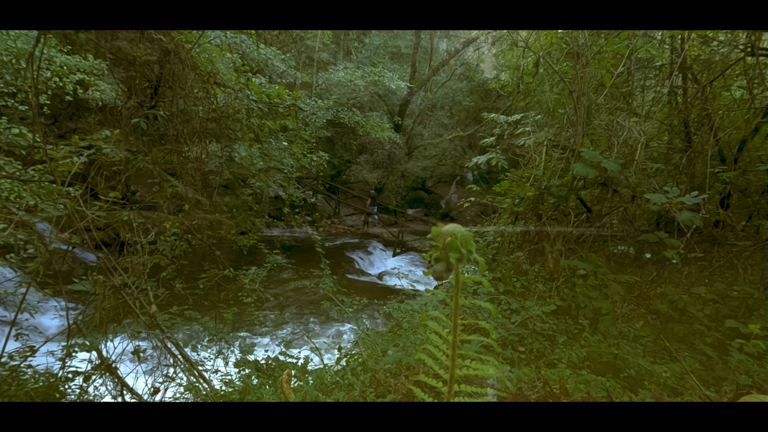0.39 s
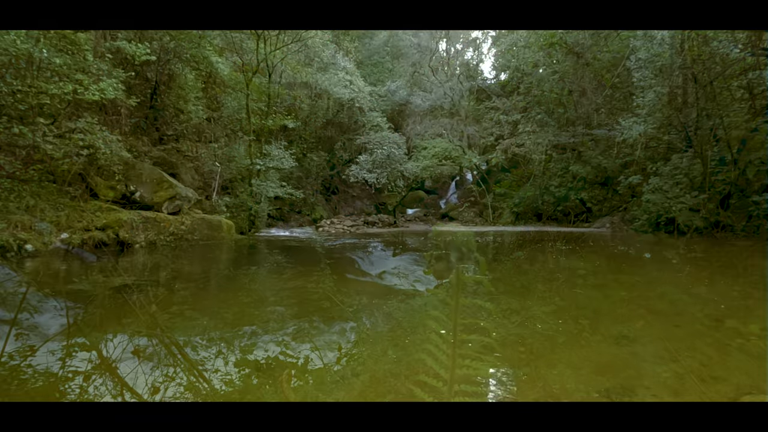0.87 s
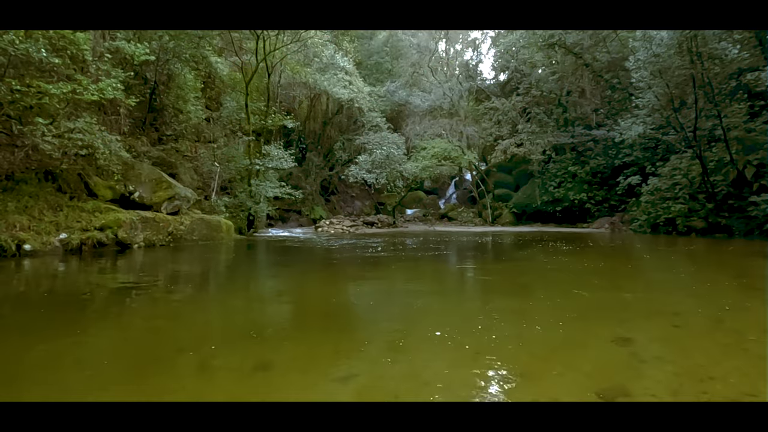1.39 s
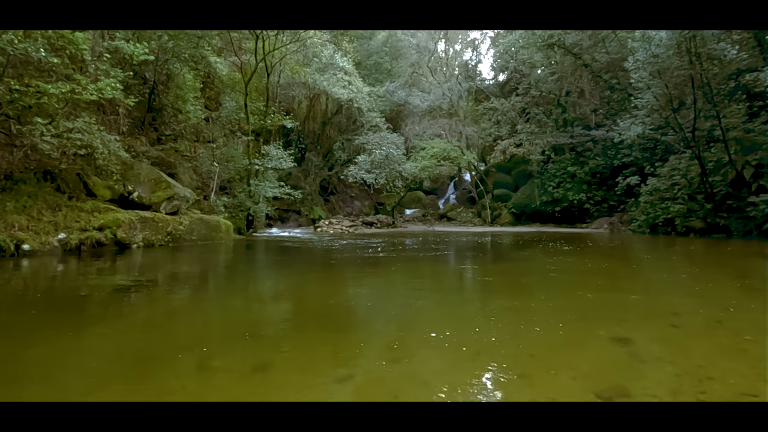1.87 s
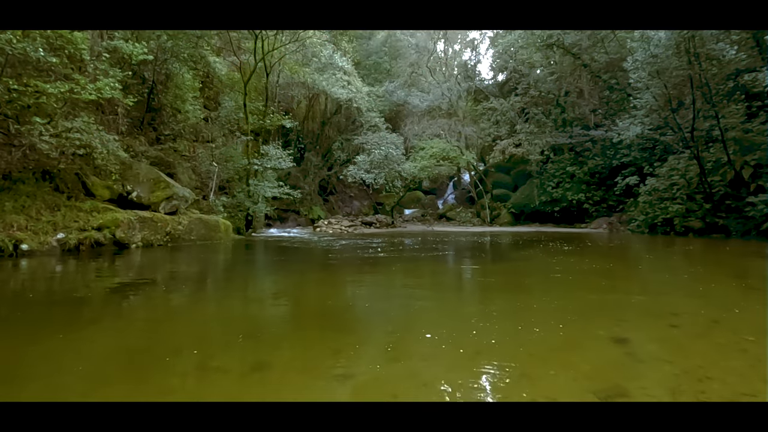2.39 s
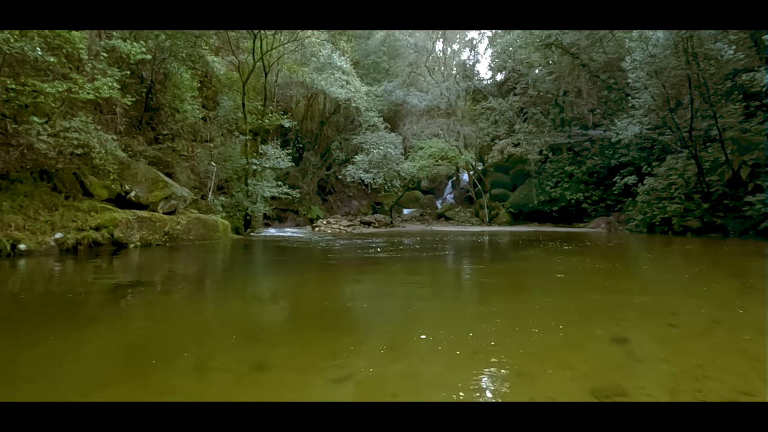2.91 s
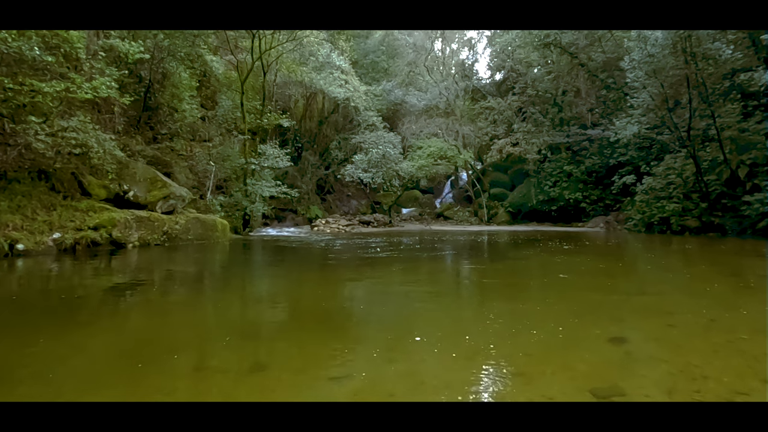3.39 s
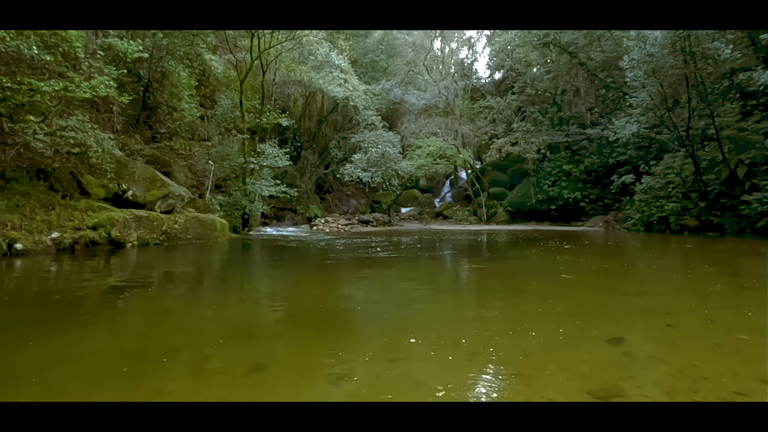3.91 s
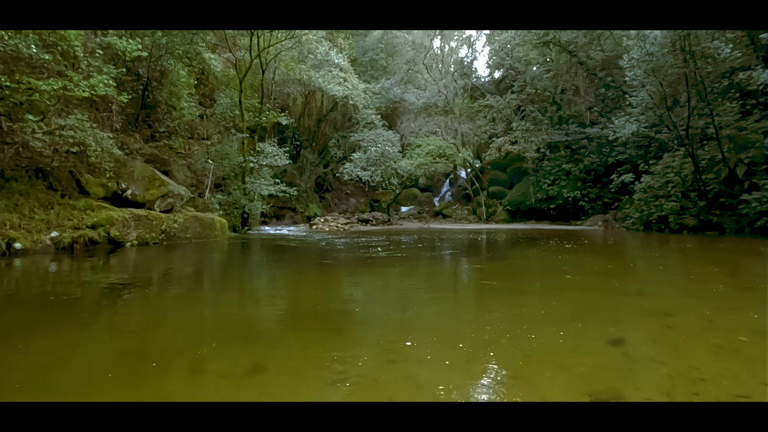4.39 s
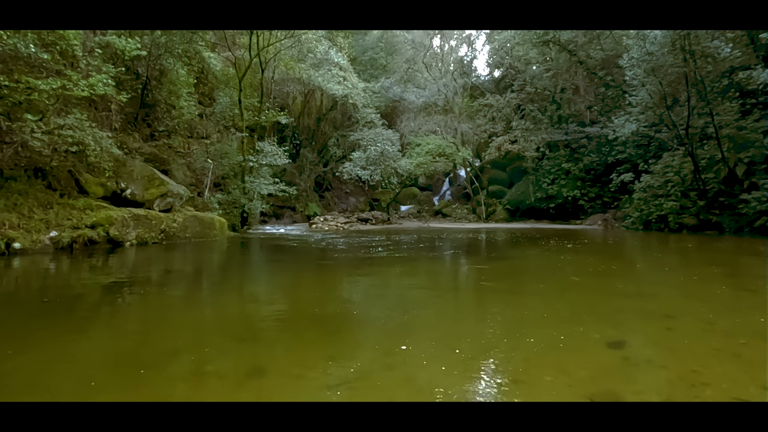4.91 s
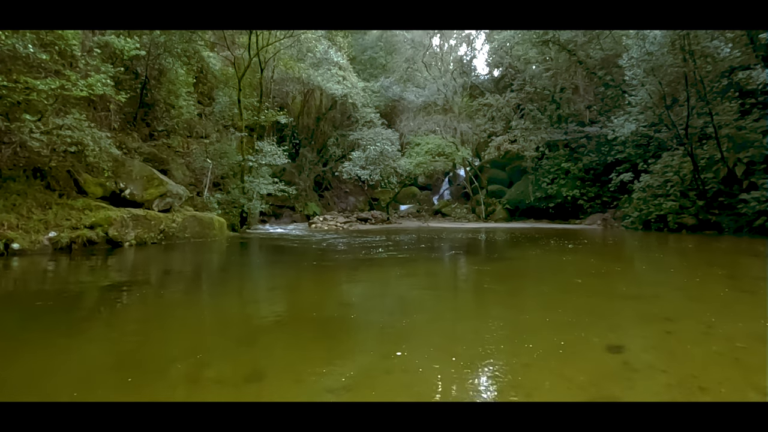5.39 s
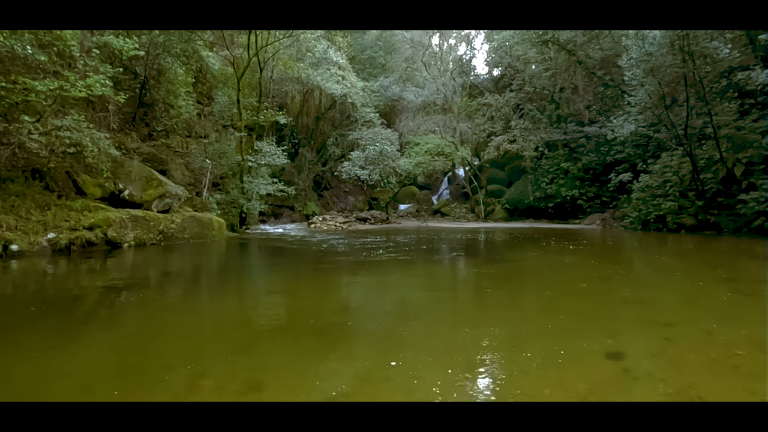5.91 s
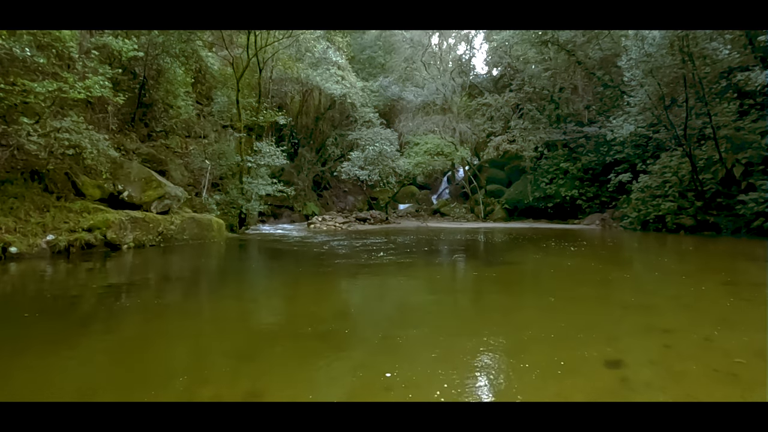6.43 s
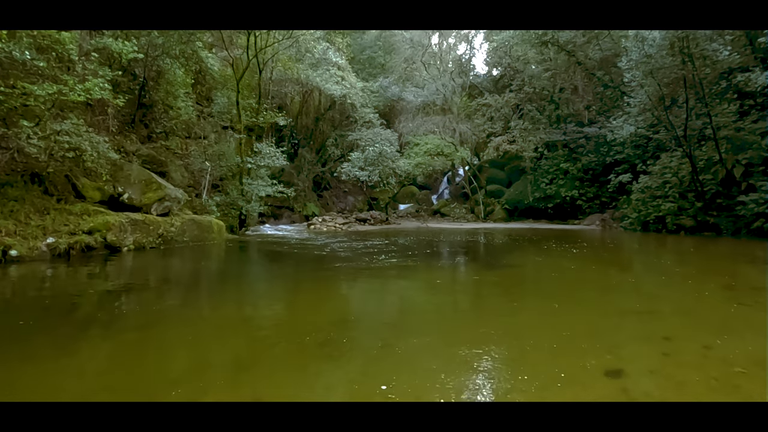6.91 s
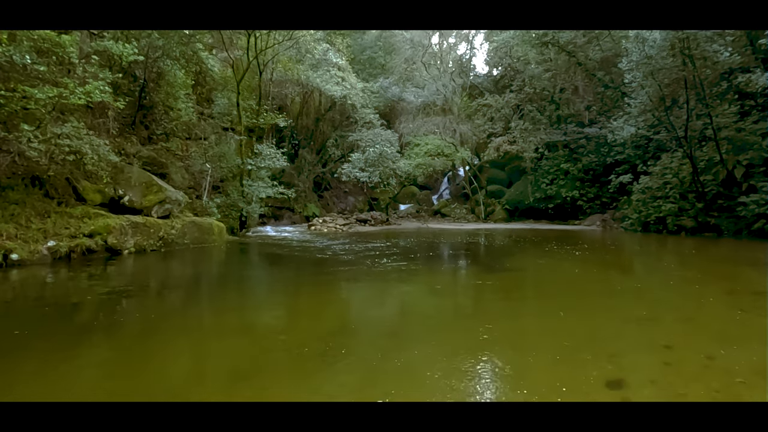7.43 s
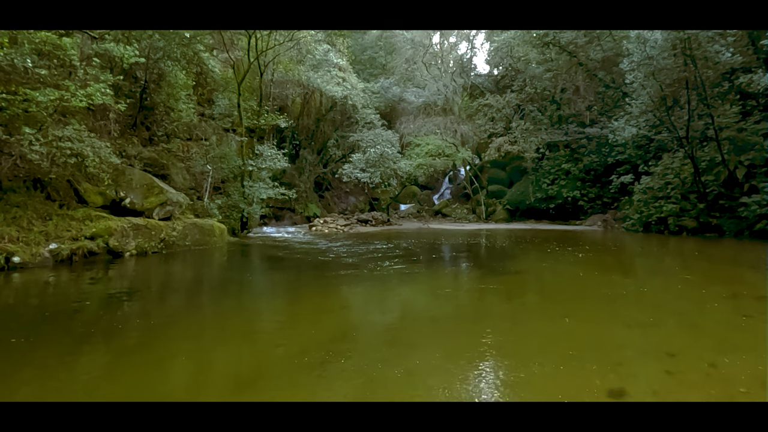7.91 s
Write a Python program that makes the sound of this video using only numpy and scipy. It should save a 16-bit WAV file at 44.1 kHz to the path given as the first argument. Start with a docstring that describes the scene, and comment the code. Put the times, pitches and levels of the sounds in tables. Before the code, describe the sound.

Silence for under a second, then falling water fades in over about half a second and holds steady to the end. A stream tumbles over small cascades into a woodland pool, heard from across the water: a smooth, dense, mid-heavy rush made of countless bursting bubbles, with a faint fizz of spray on top. Outdoors, almost centred, with no close splashes.

```python
"""Woodland cascades

A stream pours over cascades into a pool, heard from across the water: a smooth roar of bursting
bubbles and a fine fizz of spray, each filtered from drifting noise mixed with short rising tones.
A second noise, opposite in the two ears, makes the top of the fizz wide; below a narrow gap near
9 kHz a slight left-right difference is heard only in spells. After a short silence the sound fades in."""
import sys
import numpy as np
from scipy import signal
from scipy.fft import rfft, irfft, next_fast_len
from scipy.io import wavfile
from scipy.ndimage import uniform_filter1d

SR = 44100
rng = np.random.default_rng(int(sys.argv[2]) if len(sys.argv) > 2 else 0)


def persist_wave(psi):
    """Save psi, clipped to +-1, as 16-bit WAV."""
    counts = np.round(np.clip(psi, -1, 1) * 32767).astype(np.int16)
    wavfile.write(sys.argv[1], SR, np.atleast_2d(counts).T)


def boost(x):
    """Linear amplitude factor 10**(x/20) for a level x in decibels (scalar or array-like)."""
    u = np.asarray(x, float) / 20
    return 10 ** u


N = 355005  # samples

# roar of the falls, below the gap: (frequency [Hz], relative density [dB per Hz])
ROAR_SPECTRUM = [(15, -61), (25, -34.5), (79, -12), (157, -4.5), (291, 0.5), (441, -3), (564, -2.5),
                 (776, -4.5), (856, -4.5), (1330, -8.5), (2020, -7.5), (3640, -10), (6240, -20),
                 (7410, -25.5), (8800, -35), (11400, -65), (19400, -120)]
# fizz of spray, above the gap: (frequency [Hz], relative density [dB per Hz])
SPRAY_SPECTRUM = [(9100, -16), (9300, -5), (10400, 1.5), (11200, 1), (12900, -10), (13740, -20),
                  (13800, -25), (14300, -34)]
# sound that differs between the ears, against the shared sound: (frequency [Hz], level [dB])
WIDTH_SPECTRUM = [(30, -9), (80, -21), (160, -34), (250, -44), (700, -39), (1500, -30.5), (2800, -32),
                  (5000, -18.5), (8000, -11.5), (9300, -28), (10000, -21), (11000, -13), (12100, -0.5),
                  (14000, -2)]
# narrow gap heard in the treble: (from [Hz], to [Hz])
GAP_HZ = (8945, 9085)
# opening fade: (start [s], length [s])
FADE_IN_S = (.7, 0.54)
# spells in which a left-right difference is heard below the gap: (from [s], to [s])
DIFFERENCE_SPELLS_S = [(.7, 1.54), (2.8, 2.89), (3.07, 3.35), (4.4, 4.88), (5.57, 5.97), (6.27, 7.02)]
# left against right: (frequency [Hz], level [dB])
LEAN_SPECTRUM = [(10800, 0), (11650, -3), (12000, -3.5), (12600, 0)]

ROAR_RMS_DB, SPRAY_RMS_DB = -27.5, -57  # of the shared sound
GAP_GAIN_DB = -22
BUBBLES_PER_S, BUBBLE_POWER_SHARE = 9000, 0.095


def evened(x):
    """Scales to rms 1."""
    return x / np.sqrt(np.mean(x ** 2) + 1e-20)


def read_db(spectrum, hz):
    """Interpolates a spectrum on a log-frequency axis."""
    point_hz, point_db = np.transpose(spectrum)
    return np.interp(np.log(hz + 1), np.log(point_hz + 1), point_db)


def coloured(x, gain):
    """Filters x by gain(hz)."""
    size = next_fast_len(N)
    hz = np.fft.rfftfreq(size, 1 / SR)
    return irfft(rfft(x, size) * gain(hz), size)[..., :N]


def churn(patchy_db, flicker_db, crackle_db):
    """White noise whose level drifts in patches of time and pitch and flickers as splashes land."""
    hop, bins = 128, 257
    frames = N // hop + 5
    real, imag, patches = rng.standard_normal((3, frames, bins))
    patches = uniform_filter1d(patches, size=24, axis=0)
    patches = evened(uniform_filter1d(patches, size=6, axis=1))
    flicker = rng.standard_normal((frames, bins))
    flicker = evened(uniform_filter1d(flicker, size=80, axis=1))
    # the finest spray crackles more, in full from 13 kHz
    fineness = np.minimum(np.linspace(0, SR / 2 / 13000, num=bins) ** 4, 1)
    level_db = patchy_db * patches + (flicker_db + crackle_db * fineness) * flicker
    frame_spectra = (real + 1j * imag) * boost(level_db)
    noise = signal.istft(frame_spectra.T, nperseg=512, noverlap=512 - hop)[1]
    return evened(noise[:N])


def bubbles(decay_cycles, rise, spread_db):
    """Short rising tones from large bubbles to small, as many per hertz everywhere; a few are loud."""
    kinds_hz = np.geomspace(120, 13500, num=40)
    when, which, loud = rng.random((3, N))
    starts = when < BUBBLES_PER_S / SR
    size = starts * boost(-spread_db * np.log(np.maximum(loud, .003)))
    kind = np.searchsorted(np.cumsum(kinds_hz) / kinds_hz.sum(), which)  # small bubbles are the many
    out = np.zeros(N)
    for k, hz in enumerate(kinds_hz):
        cycles = np.arange(0, decay_cycles * 2, hz / SR)  # time in starting periods
        tone = np.sin(2 * np.pi * cycles * (1 + rise * cycles / decay_cycles))
        ring = tone * np.exp(-3 * cycles / decay_cycles) * np.minimum(cycles, 1)
        out += signal.oaconvolve(size * (kind == k), ring / np.linalg.norm(ring))[:N]
    return evened(out)


def in_spells(difference):
    """Passes the left-right difference only in its spells, with short ramps."""
    t = np.arange(N) / SR
    passed = sum((t > start) * (t < end) * 1. for start, end in DIFFERENCE_SPELLS_S)
    return difference * uniform_filter1d(passed, size=800)


def falls():
    """Churn and single bubbles, coloured as roar and as spray; a second churn differs between the ears."""
    water = np.sqrt(1 - BUBBLE_POWER_SHARE) * churn(patchy_db=0.49, flicker_db=0.15, crackle_db=2.0)
    water += np.sqrt(BUBBLE_POWER_SHARE) * bubbles(decay_cycles=6.2, rise=.12, spread_db=2.5)
    apart = churn(patchy_db=3.5, flicker_db=1.0, crackle_db=4.5)
    apart = coloured(apart, lambda hz: boost(read_db(WIDTH_SPECTRUM, hz)))
    both = np.array([water, apart])

    split_hz = np.mean(GAP_HZ)
    roar = coloured(both, lambda hz: boost(read_db(ROAR_SPECTRUM, hz)) * (hz < split_hz))
    spray = coloured(both, lambda hz: boost(read_db(SPRAY_SPECTRUM, hz)) * (hz > split_hz))

    roar[1] = in_spells(roar[1])
    roar *= boost(ROAR_RMS_DB) / np.std(roar[0])
    spray *= boost(SPRAY_RMS_DB) / np.std(spray[0])
    return roar + spray


def scene():
    """The falls pour steadily; shared and differing sound make left and right."""
    shared, apart = falls()
    return np.array([shared + apart, shared - apart])


def roll_off(x):
    """The treble ends steeply here."""
    return signal.sosfilt(signal.butter(12, 14320, fs=SR, output="sos"), x)


def record(dry):
    """Lowers a narrow gap near 9 kHz, leans the treble above it slightly right, fades in on a quarter sine."""
    low_hz, high_hz = GAP_HZ
    sides = np.array([[.5], [-.5]])  # half the lean to each ear

    def gain(hz):
        in_gap = (hz > low_hz) * (hz < high_hz)
        return boost(sides * read_db(LEAN_SPECTRUM, hz) + GAP_GAIN_DB * in_gap)

    heard = coloured(dry, gain)
    start_s, length_s = FADE_IN_S
    progress = np.clip((np.arange(N) / SR - start_s) / length_s, 0, 1)
    return roll_off(heard * np.sin(np.pi / 2 * progress))


dry = scene()
out = record(dry)
persist_wave(out)
```